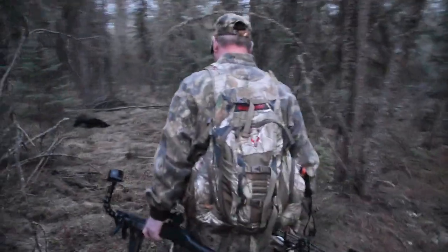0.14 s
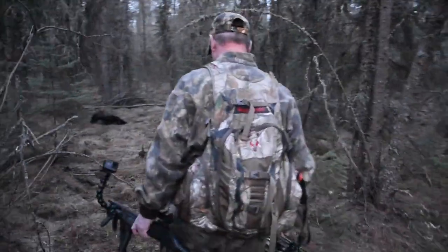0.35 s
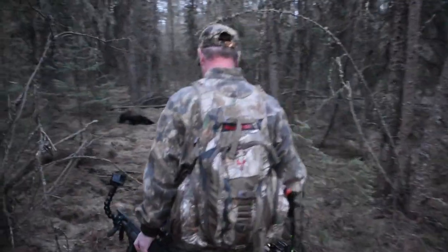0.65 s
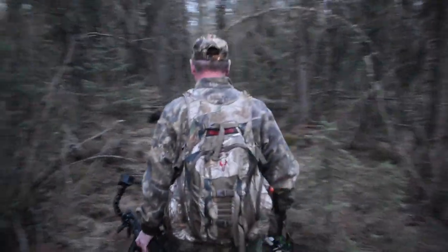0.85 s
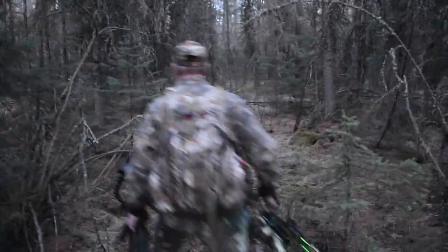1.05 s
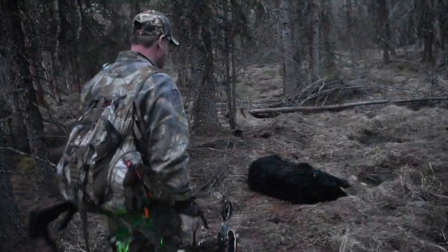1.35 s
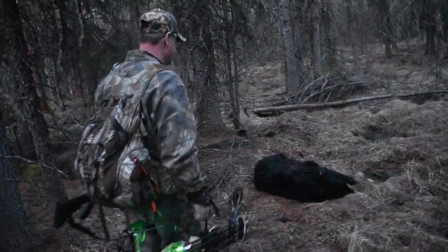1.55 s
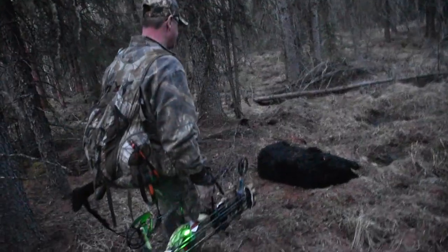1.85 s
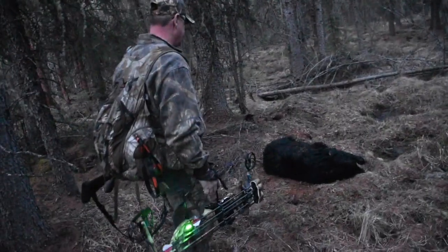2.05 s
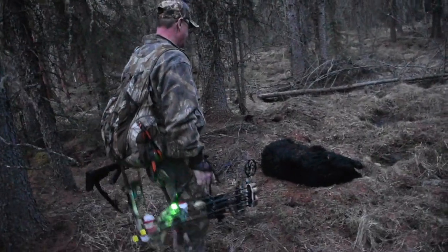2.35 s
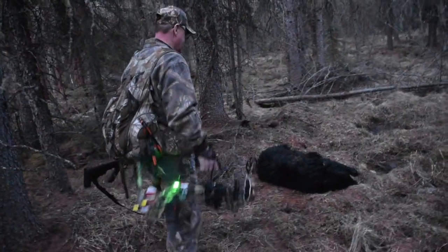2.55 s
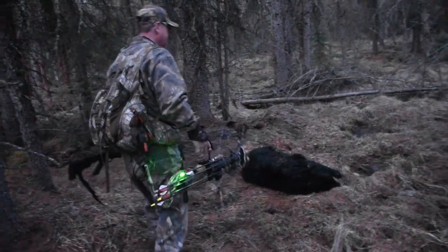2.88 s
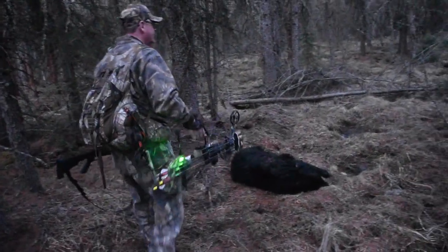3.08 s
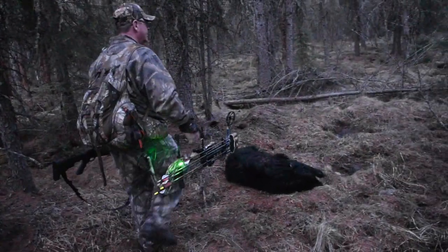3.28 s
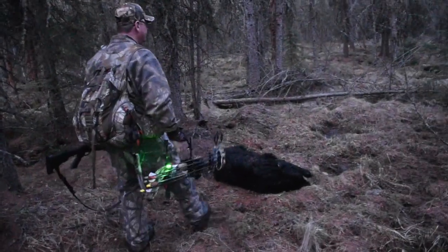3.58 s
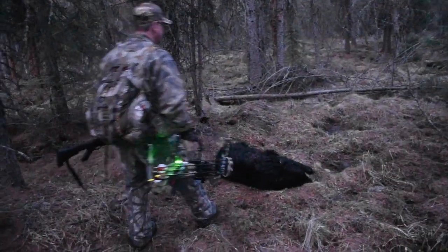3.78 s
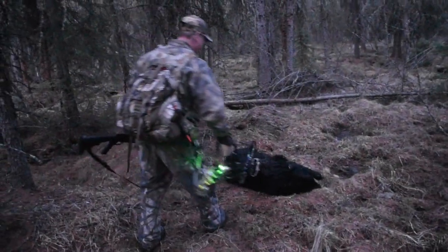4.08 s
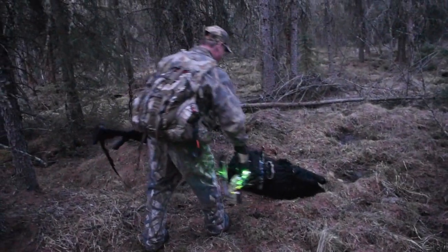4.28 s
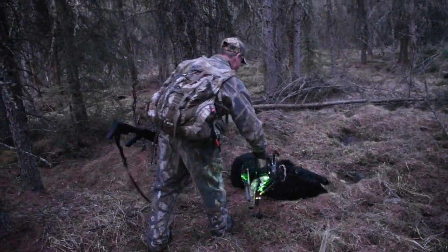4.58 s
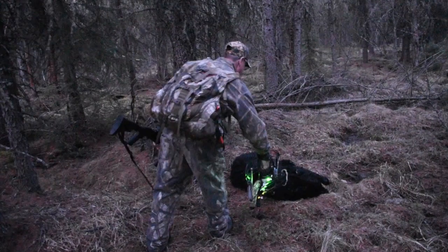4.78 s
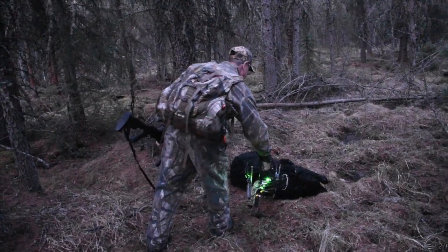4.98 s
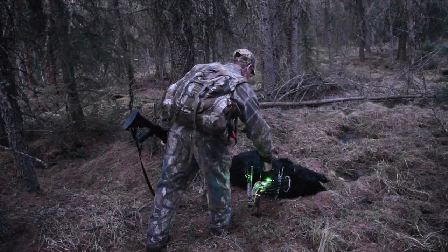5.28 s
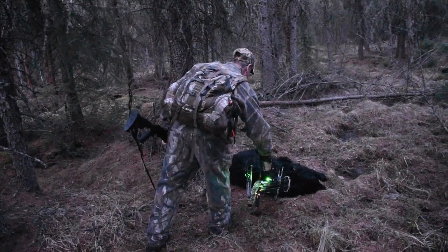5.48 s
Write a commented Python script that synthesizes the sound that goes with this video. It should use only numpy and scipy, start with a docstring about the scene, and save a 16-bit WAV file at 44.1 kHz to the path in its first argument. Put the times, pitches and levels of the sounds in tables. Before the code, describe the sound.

Footsteps crunch through dry grass with sharp twig snaps, slowing to a stop as metal gear clinks faintly.

```python
"""Footsteps over dry forest ground

A still forest, heard from close by on a hand-held microphone. A walker with a pack and a bow crosses
dry grass and twigs, then slows and stops. Twigs snap underfoot, stems crackle and swish, and near the
end metal gear clinks. The hands rumble, rub and bump on the rig; the trees return a faint tail."""
import sys
import numpy as np
from scipy import signal
from scipy.fft import rfft, irfft, next_fast_len
from scipy.io import wavfile

SR = 44100
rng = np.random.default_rng(int(sys.argv[2]) if len(sys.argv) > 2 else 0)


def store_pcm(level_fs):
    """Save levels as 16-bit WAV."""
    pcm = np.round(np.clip(level_fs, -1, 1) * 32767).astype(np.int16)
    wavfile.write(sys.argv[1], SR, np.atleast_2d(pcm).T)


N = 248283
THUMP_HZ = 410   # pitch of the soil under a light snap


def from_db(db):
    """Decibels to gain."""
    return 10 ** (np.asarray(db) / 20)


def together(*levels_db):
    """Level of unrelated sounds heard at once."""
    return 10 * np.log10(sum(from_db(db) ** 2 for db in levels_db))


def rms_one(x):
    """Scale to rms 1."""
    return x / np.sqrt(np.mean(x ** 2) + 1e-20)


def in_time(rows):
    """One per-sample curve for each column after the time."""
    s, *columns = np.transpose(rows)
    return [np.interp(np.arange(N) / SR, s, c) for c in columns]


def add(out, s, sound):
    """Mix a sound in at time s."""
    at = max(0, int(s * SR))
    out[at:at + len(sound)] += sound[:N - at]


def band(x, low_hz, high_hz, order=2):
    """Causal band-pass."""
    sos = signal.butter(order, [low_hz, min(high_hz, .45 * SR)], "band", fs=SR, output="sos")
    return signal.sosfilt(sos, x)


def peak(x, hz, q):
    """A broad resonance."""
    return signal.lfilter(*signal.iirpeak(min(hz, .4 * SR), q, SR), x)


def coloured(x, spectrum):
    """Shape a signal by rows of f/Hz, level/dB; rms 1."""
    hz, db = np.transpose(spectrum)
    size = next_fast_len(N)
    f = np.maximum(np.arange(size // 2 + 1) * SR / size, 1)
    gain = from_db(np.interp(np.log(f), np.log(hz), db))
    return rms_one(irfft(rfft(x, size) * gain, size)[:N])


def drift(per_s):
    """A random wander with spread 1."""
    knots = rng.standard_normal(4000)
    return np.interp(np.arange(N) / SR * per_s, np.arange(len(knots)), knots) * np.sqrt(3 / 2)


def ring(t, hz, t60):
    """A struck mode."""
    return np.sin(2 * np.pi * hz * t) * from_db(-60 * t / t60)


def still_air(level_db=-69):
    """The quiet noise bed of still air among the trees."""
    # spectrum of the air: f/Hz, level/dB
    spectrum = [(30, 1), (120, 0), (300, -12), (500, -16.5), (1000, -17), (3300, -22.5), (5000, -25.5),
                (16000, -22)]
    return from_db(level_db) * coloured(rng.standard_normal(N), spectrum)


def forest(x, level_db=-31, t60_s=0.45):
    """Trunks and branches scatter a faint, short tail back to the microphone."""
    t = np.arange(int(.6 * SR)) / SR
    envelope = from_db(-60 * t / t60_s) * (1 - np.exp(-t / .006))
    tail = band(rng.standard_normal(len(t)), 500, 7400, order=1) * envelope
    return from_db(level_db) * signal.fftconvolve(x, tail / np.sqrt(np.sum(tail ** 2)))[:N]


def handling(litter_db, grip_db=-69.5):
    """Unsteady hands rumble on the microphone rig; the grip rubs more with each lurch and footfall."""
    # spectra of rumble and rub: f/Hz, level/dB
    rumble_spectrum = [(12, -12), (22, -3), (35, 2), (55, -6), (80, -12.5), (120, -13), (200, -27.5),
                       (500, -59.5)]
    rub_spectrum = [(60, -15), (120, -1.5), (180, -3.5), (245, 3), (320, -3.5), (420, -13), (800, -38)]
    # rumble of unsteady hands: t/s, level/dB
    unsteady = [(0.0, -53.5), (0.38, -58.5), (2.15, -54), (3.07, -66), (3.67, -57), (4.27, -65.5),
                (5.63, -67)]
    # lurches of the rig: t/s, level/dB, half length/s
    lurches = [(0.1, -54, 0.043), (0.668, -50, 0.012), (0.975, -44, 0.023), (1.093, -54, 0.059),
               (1.38, -46.5, 0.031), (1.657, -55.5, 0.027), (1.9, -46, 0.03), (2.049, -46.5, 0.021),
               (2.19, -47, 0.072), (2.43, -47.5, 0.045), (2.76, -53.5, 0.04), (2.93, -46.5, 0.031),
               (3.33, -53, .02), (3.625, -54.5, 0.055), (5.261, -54.5, 0.034)]
    t = np.arange(N) / SR
    unsteady_db, = in_time(unsteady)
    sway = sum(from_db(db) * np.exp(-.5 * ((t - s) / half_s) ** 2) for s, db, half_s in lurches)
    sway_db = 20 * np.log10(sway + 1e-9)
    rumble_db = together(unsteady_db + .5, sway_db) + .5
    rub_db = together(grip_db, sway_db - 19, litter_db - 5)
    rumble = from_db(rumble_db) * coloured(rng.standard_normal(N), rumble_spectrum)
    rub = from_db(rub_db) * coloured(rng.standard_normal(N), rub_spectrum)
    return rumble + rub


def rig_bumps(push_s=0.0016):
    """Soft bumps swell into the hollow modes of the microphone rig."""
    # bumps on the rig: t/s, level/dB
    bumps = [(1.433, -46), (1.506, -49), (1.658, -44), (1.799, -43), (1.871, -47.5), (2.018, -42),
             (2.075, -46), (2.137, -42.5), (2.153, -55), (2.383, -45.5), (2.731, -48), (2.971, -44),
             (3.055, -46), (3.673, -47.5), (4.697, -48), (4.873, -44), (4.952, -49.5), (5.076, -36.5),
             (5.216, -53)]
    # modes of the rig: f/Hz, level/dB, t60/s
    rig_modes = [(124, -6, 0.066), (244.2, -3, 0.2), (287, -4.5, 0.045), (325, -7, 0.089)]
    out, t = np.zeros(N), np.arange(int(.25 * SR)) / SR
    swell = 1 - np.exp(-t / push_s)
    for s, db in bumps:
        for hz, mode_db, t60 in rig_modes:   # the grip shifts each mode a little
            tone = rng.choice([-1, 1]) * ring(t, hz * (1 + rng.normal(0, 0.021)), t60)
            add(out, s, from_db(db + mode_db) * tone * swell)
    return out


def gear(rattle=0.67, rattle_per_s=260):
    """Metal parts on the walker tap each other, ring on and chatter."""
    # clinks: t/s, level/dB, t60/s
    clinks = [(4.386, -57, 0.27), (4.655, -63, 0.063), (4.666, -54, 0.04026), (4.696, -56.5, 0.26),
              (4.861, -46.5, 0.036), (4.915, -49, 0.045), (4.960, -62, 0.28), (5.070, -47, 0.036)]
    # modes of the metal: f/Hz, level/dB, share of the clink's t60
    metal_modes = [(2330, -8, 0.3), (3158, -22, .5), (3350, -5.5, 0.63), (3500, -0.5, 0.61),
                   (3560, 3.5, 0.81), (3660, -12, 0.69), (3910, -27.5, 0.66), (4429.1, -21, 0.52)]
    out, t = np.zeros(N), np.arange(int(.4 * SR)) / SR
    for s, db, t60 in clinks:
        for hz, mode_db, share in metal_modes:
            chatter = 1 + rattle * np.interp(t * rattle_per_s, np.arange(400), rng.standard_normal(400))
            gain = from_db(db + mode_db + rng.normal(0, 1.8))
            add(out, s, gain * chatter * ring(t, hz, t60 * share))
    return out


def walking(attack_s=.03, release_s=0.032):
    """Levels in dB of litter, stems and swish: each step swells, holds and dies away over a low stir."""
    # rustle between steps, fading as the walker slows and stops: t/s, stems/dB, grass/dB
    stir = [(0.0, -54, -50.5), (0.3, -59, -62.5), (0.56, -63.5, -62.5), (0.88, -60, -59),
            (1.07, -55.5, -54), (1.19, -53, -53.5), (1.57, -67.5, -66.5), (1.85, -70.5, -70.5),
            (2.18, -70, -70), (2.59, -70, -64.5), (2.81, -72, -69), (3.51, -68.5, -66.5),
            (3.76, -70, -61.5), (3.89, -68.5, -61), (4.89, -69.5, -72.5), (5.11, -69.5, -72),
            (5.3, -81, -73), (5.63, -84, -74)]
    # footfalls and leg swings: t/s, hold/s, stems/dB, litter over stems/dB, swish over stems/dB
    steps = [(0.051, .1, -48.5, -5, 1), (0.21, .07, -60.5, -0.5, -3), (0.873, 0.15, -53.5, 0, -4.5),
             (1.089, .18, -60, -5, 2.5), (1.523, .06, -60.5, -2, -2), (2.454, .08, -68, -3, 2),
             (3.12, .1, -68, -2, -5), (3.593, .1, -64, -1, -2.5), (4.416, .12, -68, 5, 4.5),
             (5.098, .03, -66, 6.5, -7)]
    t = np.arange(N) / SR
    stir_db, grass_db = in_time(stir)
    power = from_db([stir_db, stir_db + .5, grass_db - 2.5]) ** 2
    for s, hold_s, db, litter_db, swish_db in steps:
        rise = np.exp(-np.maximum((s - t) / attack_s, 0) ** 2)
        fall = np.exp(-np.maximum(t - s - hold_s, 0) / release_s)
        power += np.outer(from_db([db + litter_db, db, db + swish_db]), rise * fall) ** 2
    return 10 * np.log10(power)


def crackle(per_s, spread_db, smooth):
    """Countless stems give way in clumps, a few much louder than the rest, over a smooth rub."""
    breaks = rng.random(N) < per_s * from_db(4 * drift(25)) / SR
    sizes = from_db(spread_db * np.minimum(rng.exponential(1, N), 4.5)) * rng.choice([-1, 1], N)
    return rms_one(breaks * sizes) + smooth * rng.standard_normal(N)


def brush(litter_db, stems_db, swish_db, flutter_db=1.6, top_hz=8500):
    """Boots crush the litter, bend stems and sweep through dry grass; some crackles sound in all three."""
    # spectra of crushed litter, bent stems and swept grass: f/Hz, level/dB
    litter_spectrum = [(100, -12.5), (250, -3.5), (450, -0.5), (700, 0.5), (1000, -4.5), (1700, -5.5),
                       (2600, -23), (6000, -55.5)]
    stem_spectrum = [(800, -33), (1500, -19), (2000, -4), (2700, -1.5), (3300, 3), (3900, -6), (5000, -10),
                     (7000, -22.5), (12000, -53)]
    swish_spectrum = [(2500, -40.5), (4200, -10.5), (5500, 1), (7500, 1), (10000, -2), (13000, -1.5),
                      (16000, -10)]
    # dryness of the grass, which lifts the top of the swish: t/s, lift/dB
    dryness = [(0, -4), (.7, 3), (1.3, 3), (1.7, 2), (2.4, 7), (3.7, 5.5), (4.6, 0.5), (5.63, 2.5)]
    lift_db, = in_time(dryness)
    shared = 0.98 * crackle(per_s=300, spread_db=5.5, smooth=1.0)
    litter_gain = from_db(litter_db + 1.5 * drift(60))
    litter = coloured(shared + crackle(per_s=250, spread_db=5.0, smooth=0.69), litter_spectrum)
    stems_gain = from_db(stems_db + 2.5 + 2.0 * drift(70))
    stems = coloured(shared + crackle(per_s=880, spread_db=3.0, smooth=0.69), stem_spectrum)
    hiss = coloured(shared + crackle(per_s=4000, spread_db=3.0, smooth=0.57), swish_spectrum)
    soft = signal.sosfiltfilt(signal.butter(2, top_hz, fs=SR, output="sos"), hiss)
    swish_gain = from_db(swish_db - 2 + 0.52 * drift(50))
    swish = soft + from_db(lift_db) * (hiss - soft)
    flutter = from_db(flutter_db * drift(25))
    return flutter * (litter_gain * litter + stems_gain * stems + swish_gain * swish)


def needles(rustle_db, per_s=55, under_db=5.0, spread_db=2.5):
    """Single dry needles tick, each size at its own pitch, louder as more stems are disturbed."""
    out = np.zeros(N)
    for hz in np.geomspace(2500, 12000, 5):
        breaks = rng.random(N) < per_s / 5 / SR
        clicks = breaks * from_db(spread_db * np.minimum(rng.exponential(1, N), 3)) + 1e-18
        out += rms_one(peak(clicks, hz, q=1.7))
    return from_db(rustle_db - under_db) * rms_one(out)


def scrapes(width=1.3):
    """Grass and branches drag along boots, cloth and gear in swells of fine, pitched crackle."""
    # single scrapes: middle t/s, half length/s, level/dB, f/Hz
    strokes = [(0.04, .011, -46.5, 3750), (0.136, 0.082, -50.5, 4340), (0.69, 0.13, -58, 4500),
               (0.994, .013, -51, 8030), (1.078, .01, -46, 5900), (1.295, 0.038, -48, 7300),
               (1.539, 0.0055, -51, 7340), (1.575, 0.021, -53, 7400), (1.779, 0.03, -62, 2380),
               (2.374, .0076, -59, 12000), (2.458, .015, -55, 11500), (2.752, .039, -62.5, 2880),
               (2.973, 0.057, -64.5, 560), (3.19, .025, -59, 10000), (3.625, 0.019, -61, 2700),
               (4.085, .011, -56, 11400), (4.427, .0085, -49, 3953), (4.665, .008, -64, 3360),
               (4.712, 0.015, -70, 3550), (4.97, .012, -65.5, 3680)]
    out, grains = np.zeros(N), crackle(per_s=1800, spread_db=6.0, smooth=0.67)
    for s, half_s, db, hz in strokes:
        at = np.arange(max(0, int((s - 3 * half_s) * SR)), int((s + 3 * half_s) * SR))
        swell = np.exp(-.5 * ((at / SR - s) / half_s) ** 2)
        out[at] += from_db(db) * swell * rms_one(band(grains[at], hz / width, hz * width, order=1))
    return out


def debris(level_db, pitch_hz, settle_s=0.022, per_s=1500):
    """Bits of bark and needles crunch and settle after a snap."""
    t = np.arange(int(.15 * SR)) / SR
    bits = rng.standard_normal(len(t)) * (.06 + (rng.random(len(t)) < per_s / SR))
    crunch = rms_one(band(bits, .3 * pitch_hz, 1.3 * pitch_hz, order=1))
    return from_db(level_db) * crunch * np.exp(-t / settle_s)


def snap(levels_db, thump_hz, splinter_hz, tear_s, fibres=0.11, wood_hz=3300):
    """One fibre breaks with a click, its neighbours tear, the twig rings briefly and the soil thumps."""
    # dead modes of the soil: multiple of the thump pitch, level/dB, t60/cycles
    soil_modes = [(.55, 0.5, 4), (.9, 2, 6.1), (1.45, 1, 9.6), (2.2, 0, 5), (2.95, -5, 7.6)]
    # wood registers (knock, crack, splinter): low f/Hz, high f/Hz, ring time/s, ring strength
    registers = [(899, 1960, 0.0023, 1), (2158, 4500, 0.0035, 0.23), (4200, 22000, 0.001, 0.56)]
    t = np.arange(int(.04 * SR)) / SR
    fracture = fibres * rng.standard_normal(len(t)) * np.exp(-t / (1.1 * tear_s))
    fracture[0] += 1
    thump = sum((-1) ** k * from_db(db) * ring(t, multiple * thump_hz, cycles / (multiple * thump_hz))
                for k, (multiple, db, cycles) in enumerate(soil_modes))
    wood = []
    for low_hz, high_hz, ring_s, strength in registers:
        click = rms_one(band(fracture, low_hz, high_hz))
        shiver = rng.standard_normal(len(t)) * np.exp(-t / (ring_s + .5 * tear_s))
        wood.append(click + strength * rms_one(band(shiver, low_hz, high_hz)))
    knock, crack, splinter = wood
    crack = crack + 0.63 * peak(crack, wood_hz, q=6.8)
    splinter = splinter + 0.56 * peak(splinter, splinter_hz, q=1.6)
    # thin dry splinters reach much higher than thick ones
    splinter = band(splinter, 2000, splinter_hz ** 2 / 6800, order=1)
    parts = thump, knock, crack, splinter
    return sum(.5 * from_db(db) * rms_one(part) for db, part in zip(levels_db, parts))


def twiglets(rustle_db, swish_db, count=44, over_db=3.0, spread_db=1.5):
    """Small twigs break at random, more often as the legs move, a little louder than the rustle."""
    out, travel = np.zeros(N), np.cumsum(from_db(0.27 * swish_db))
    for k, (jitter, size, thinness) in enumerate(rng.uniform(-1, 1, (count, 3))):
        at = np.searchsorted(travel, (k + .5 + .5 * jitter) / count * travel[-1])
        db = rustle_db[at] + over_db + spread_db * size
        levels_db = db - 10.5, db - 4.5, db, db   # thump, knock, crack, splinter
        splinter_hz = 7800 * 2 ** (.3 * thinness)
        add(out, at / SR, snap(levels_db, THUMP_HZ, splinter_hz, tear_s=0.00048))
    return out


def twigs(bounce_db=-18, debris_db=-14, deep_db=-36, octaves_per_db=.048):
    """Twigs snap underfoot; a duller bounce off the ground reaches the microphone just after each."""
    # snaps: t/s, crack level/dB, thump, knock and splinter over the crack/dB, splinter f/Hz, tearing/s
    snaps = [(0.0758, -48, -9, -11, 8, 6830, .0006), (0.084, -7, -15, -26, -8, 6650, 0.0022),
             (0.0924, -36.5, -16, -24, 7, 5500, .002), (0.129, -29.5, -7, -20, 4, 5140, 0.00074),
             (0.2342, -42.5, 2.5, -8, -4.5, 8740, 0.013), (0.2606, -44.5, -12, -7, -11, 7370, .0014),
             (0.3447, -47.5, 7.5, -2.5, -6, 6300, 0.00076), (0.388, -47, 0, -5.5, -13, 6250, .0024),
             (0.5805, -35.5, -5, -6.5, -1.5, 6200, 0.00064), (0.5957, -47.5, -10, -8, 10, 6650, .0004),
             (0.6333, -48.5, -14, -26, 4.5, 7800, 0.0015), (0.6382, -43.5, 1.5, -31, -15, 6500, 0.001),
             (0.6574, -44.5, -7, -7.5, -2.5, 6200, 0.0018), (0.7406, -62.5, 15.5, 6, 3, 7200, 0.0033),
             (0.8366, -42.5, -10, -7.5, -23, 5230, 0.0024), (0.8709, -45.5, 6, -4, -8, 6100, 0.0006),
             (0.889, -52, 4.5, -6, 8.5, 6160, 0.0016), (0.9416, -44, -3, -6, -7, 7000, 0.013),
             (0.9522, -22, -6, -8.5, -5.5, 5150, 0.0019), (0.9923, -48.5, -2.5, -2, -3, 7900, 0.0012),
             (1.0685, -42, -5.5, -31, -4, 7250, 0.0027), (1.1089, -37.5, -18.5, -4, -3, 7200, .0006),
             (1.1186, -46.5, -2.5, -7, 1, 8400, 0.00078), (1.1693, -43.5, 2.5, 7, -.5, 8900, .0014),
             (1.2422, -33.5, -15.5, -8, -1.5, 8210, 0.005),
             (1.3835, -36.5, -8.5, -15.5, -1.5, 9200, 0.0003), (2.119, -56, -12, -7, -8.5, 8340, .0009),
             (2.2207, -54, -14.5, -16, -9.5, 7300, 0.0038), (2.2495, -37.5, -5.5, -9, 0, 7850, 0.0039),
             (2.4438, -33, -8, -12, -1.5, 9400, .002), (2.62, -44.5, -4, -6, -1, 8620, 0.00016),
             (2.6988, -44.5, 0, -11, -6.5, 10200, .0007), (3.327, -65, 3, -8, 6.5, 8820, 0.0012),
             (3.5175, -40.5, -4.5, -2.5, 11.5, 10800, 0.00023),
             (3.6027, -44.5, -20.5, -12, -11, 7000, 0.0003), (3.765, -52.5, -7, -11, 4, 8750, .0007),
             (3.788, -48.5, -15, -5.5, -8, 7670, 0.0004), (3.839, -44, -17, -10.5, 4, 7140, 0.00046),
             (3.8636, -53.5, -15, -5, 2, 7300, 0.00082), (3.8826, -41.5, -13.5, -21, 1.5, 7000, .0007),
             (3.8917, -48, -14, -5.5, 6.5, 7800, 0.00058), (3.9934, -52.5, 4.5, -3.5, 2, 7830, .005),
             (4.1037, -54.5, -7.5, -15, 6.5, 7800, 0.00032), (4.135, -56.5, -13, -2, 0, 9300, 0.0008),
             (4.181, -49, -11, -15.5, -1.5, 7050, .001), (4.4104, -25.5, -4, -6.5, -1.5, 7250, 0.00045),
             (4.4446, -43.5, 10, 3, 11, 8400, 0.0007), (4.4817, -50.5, -5, -12, -2, 7850, .0004),
             (4.5031, -44, -4.5, -8, .5, 7450, 0.00062), (4.6395, -60.5, -3, 2.5, -13, 9300, .0006),
             (4.8601, -50, -5.5, -6, -8.5, 6440, 0.0028), (5.069, -56, -2, 0.5, -9.5, 6440, 0.003),
             (5.101, -36, -6.5, -10, -4, 10400, .0005), (5.1313, -44, -3, -.5, -1, 10400, .0014),
             (5.1647, -57, -2, -5, 1.5, 8500, .0012), (5.2538, -61.5, 0, 1, 4.5, 11500, .0006)]
    out = np.zeros(N)
    for s, db, weight_db, knock_db, bright_db, splinter_hz, tear_s in snaps:
        thump_db, splinter_db = db + weight_db, db + bright_db
        # above deep_db the boot sinks deeper and the thump falls in pitch
        thump_hz = THUMP_HZ * 2 ** (-octaves_per_db * max(thump_db - deep_db, 0))
        sound = snap((thump_db, db + knock_db, db, splinter_db), thump_hz, splinter_hz, tear_s)
        add(out, s, sound)
        add(out, s + rng.uniform(0.0041, 0.0073), from_db(bounce_db) * band(sound, 500, 8700, order=1))
        # heavy, splintering breaks shed the most debris
        add(out, s, debris(min(thump_db, splinter_db) + debris_db, splinter_hz))
    return out


def scene():
    """Everything at the microphone, in mono; only snaps and clinks carry a tail from the trees."""
    litter_db, stems_db, swish_db = walking()
    rustle_db = .5 * (stems_db + swish_db)
    sharp = twigs() + gear() + twiglets(rustle_db, swish_db)
    air = still_air()
    ground = brush(litter_db, stems_db, swish_db) + needles(rustle_db) + scrapes()
    return (air + forest(sharp) + handling(litter_db) + rig_bumps() + ground + sharp)[None]


def record(dry, cutoff_hz=16200):
    """The loudest snap overloads the input; a steep low-pass cuts the top."""
    clipped = np.clip(dry, -1, 1)
    return signal.sosfilt(signal.ellip(10, .1, 70, cutoff_hz, fs=SR, output="sos"), clipped)


dry = scene()
out = record(dry)
store_pcm(out)
```